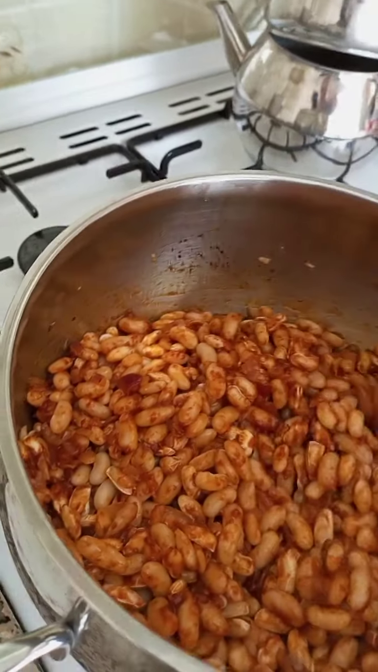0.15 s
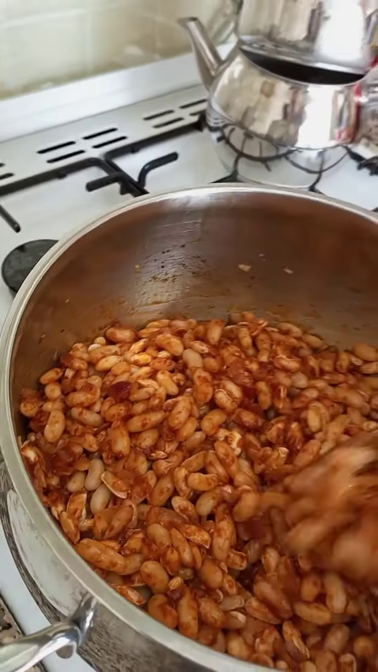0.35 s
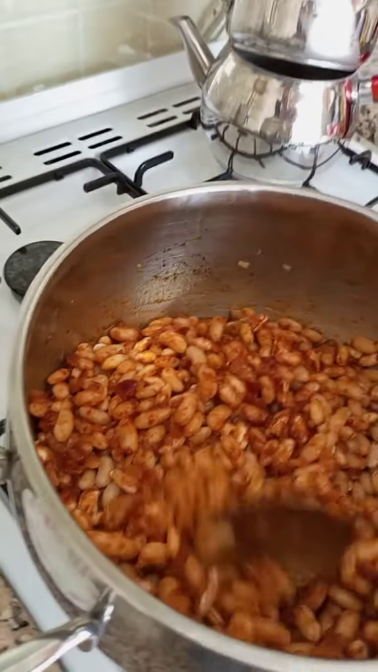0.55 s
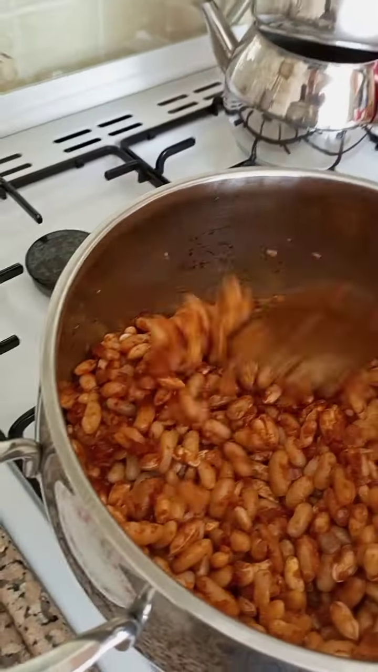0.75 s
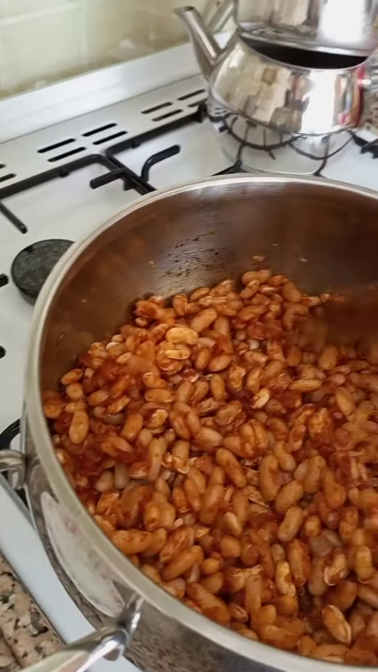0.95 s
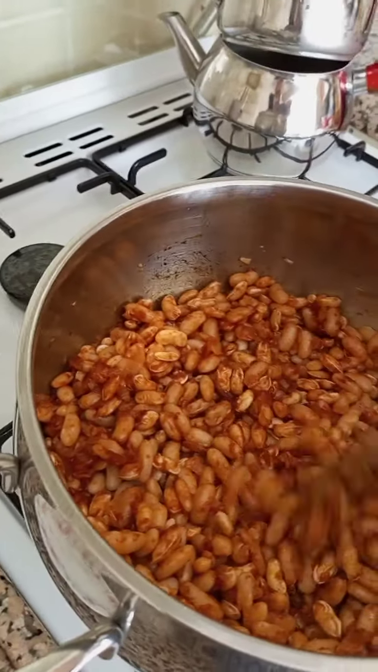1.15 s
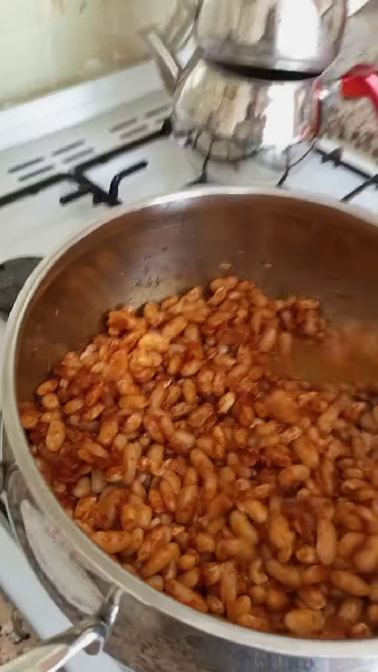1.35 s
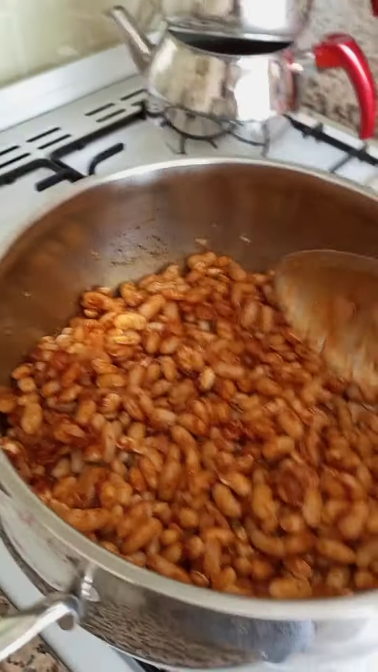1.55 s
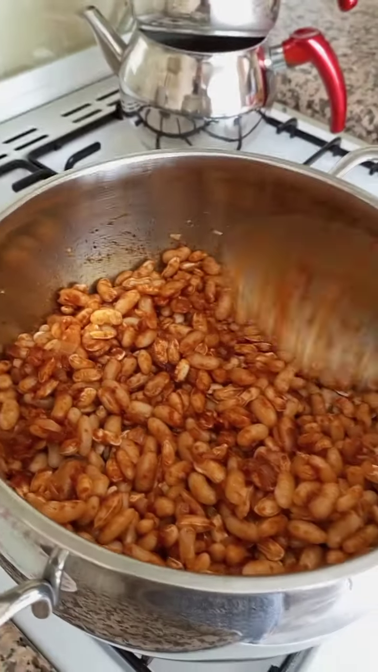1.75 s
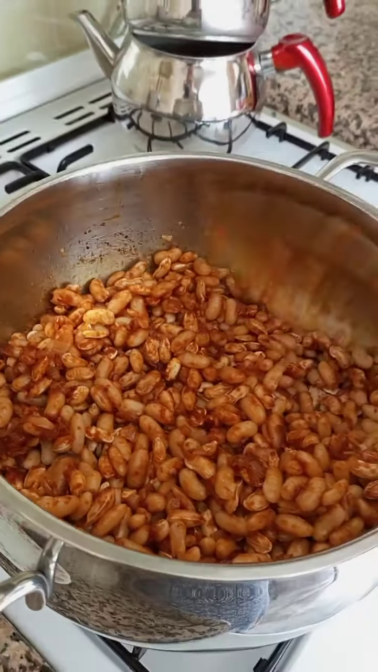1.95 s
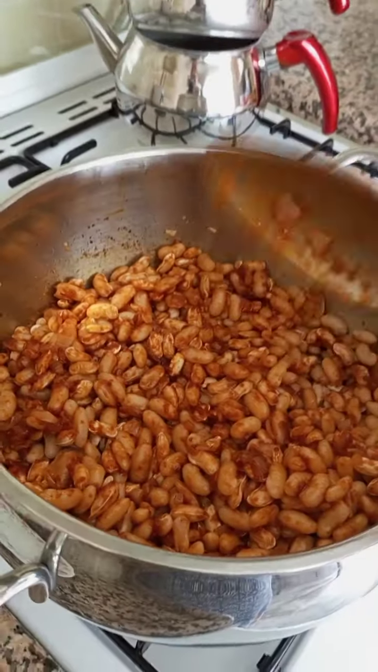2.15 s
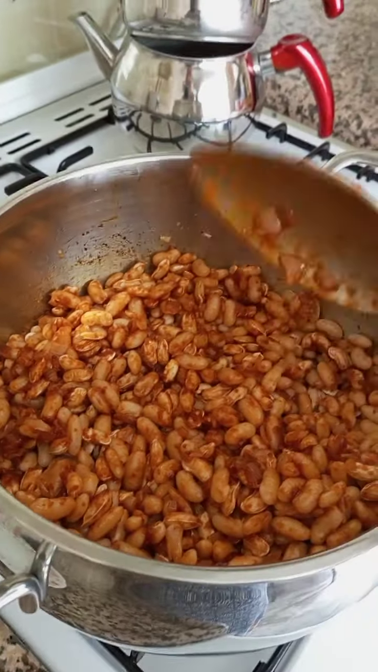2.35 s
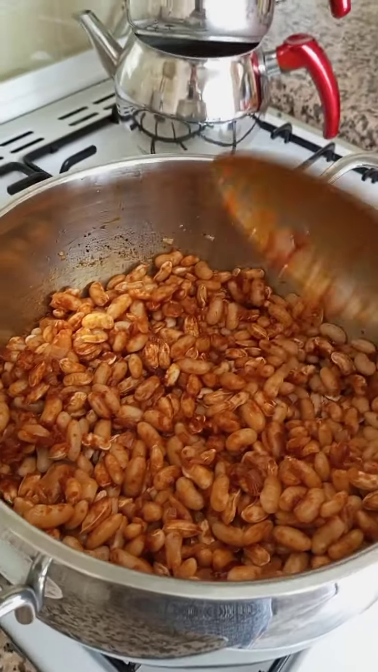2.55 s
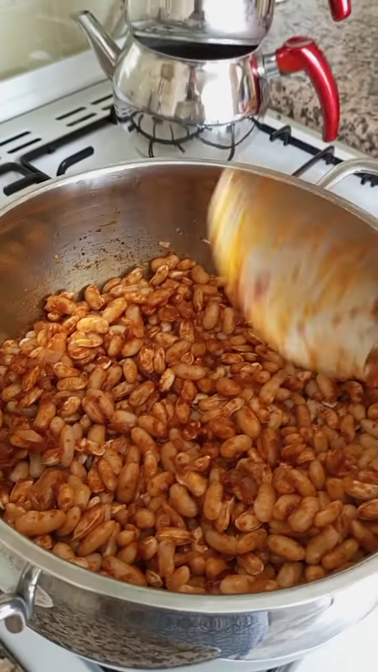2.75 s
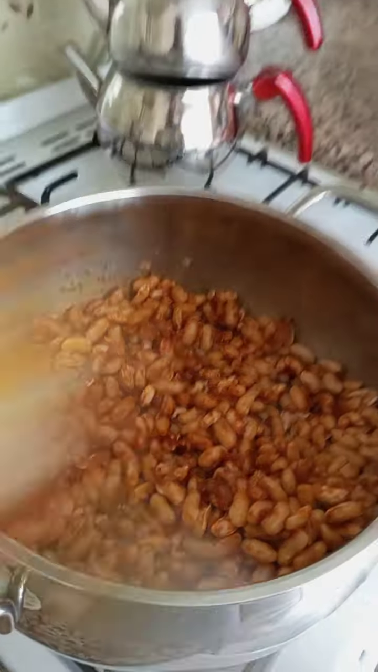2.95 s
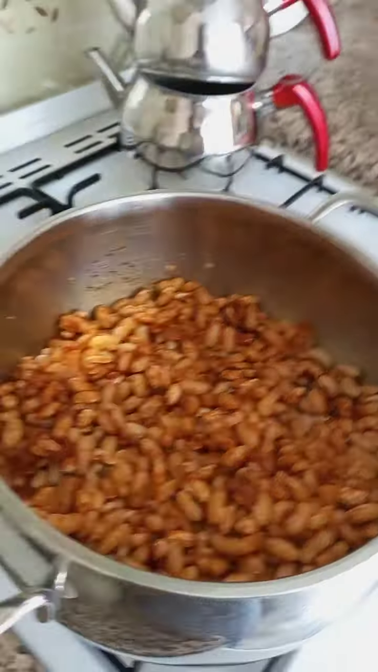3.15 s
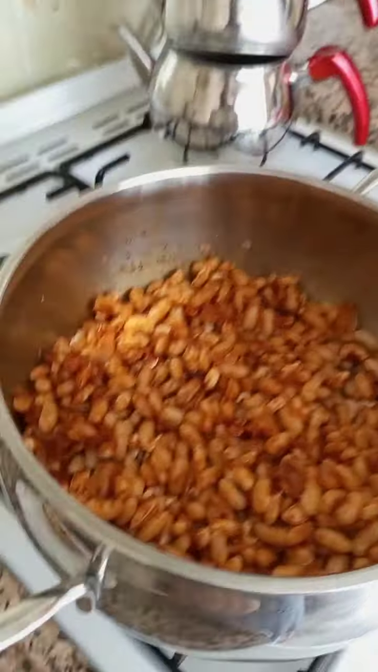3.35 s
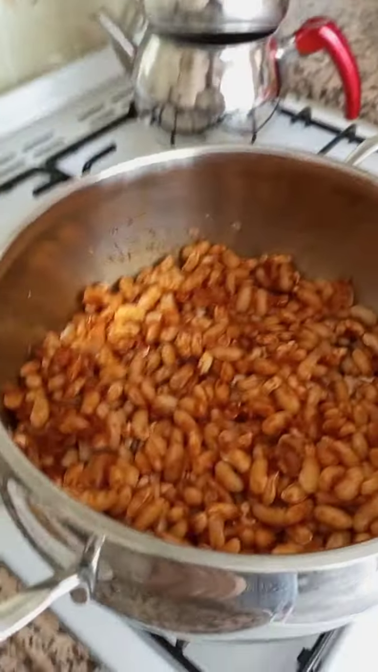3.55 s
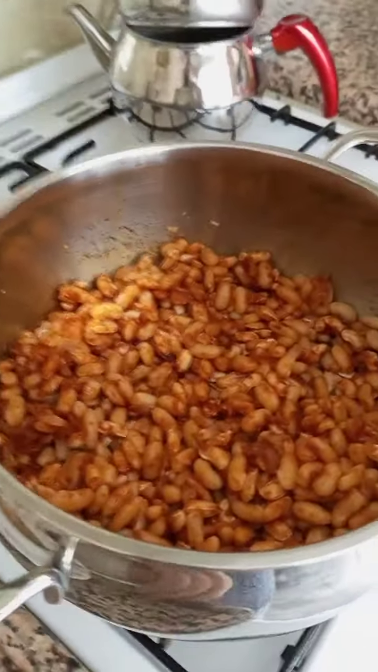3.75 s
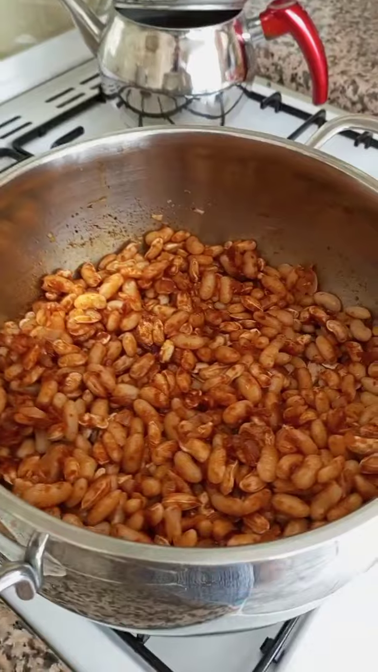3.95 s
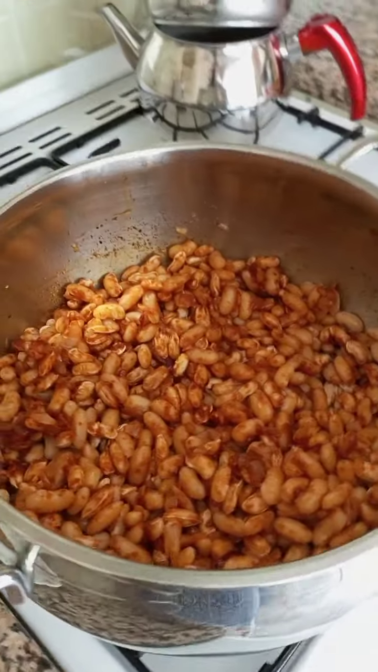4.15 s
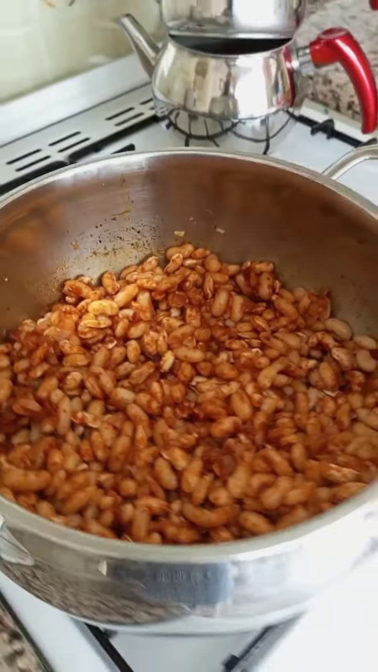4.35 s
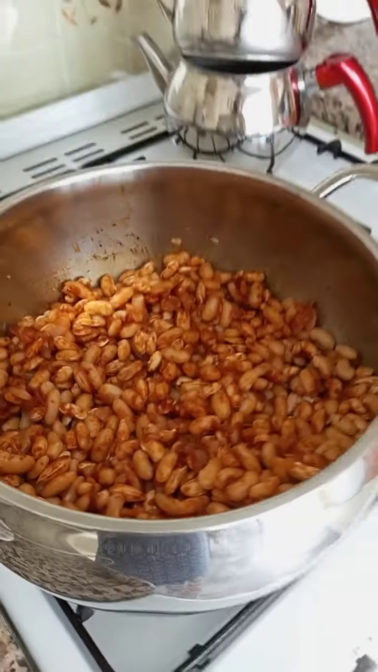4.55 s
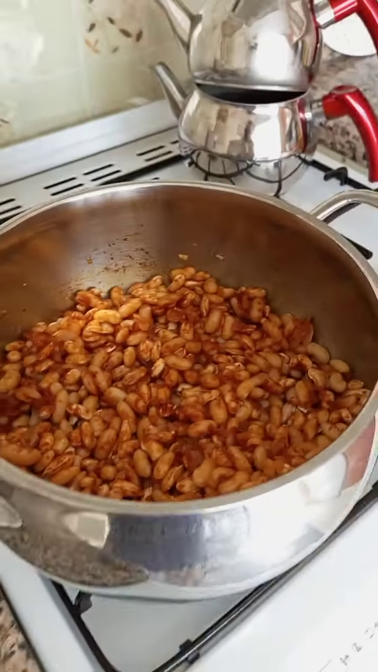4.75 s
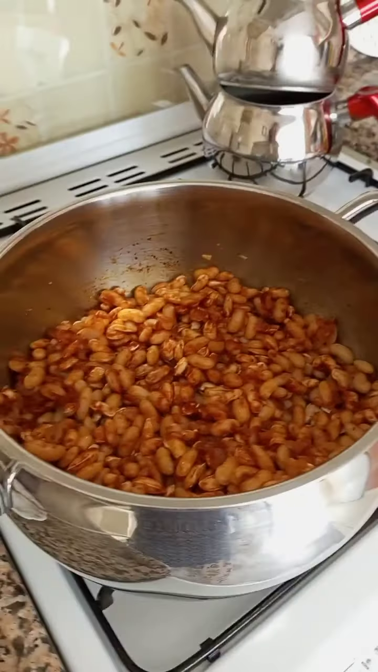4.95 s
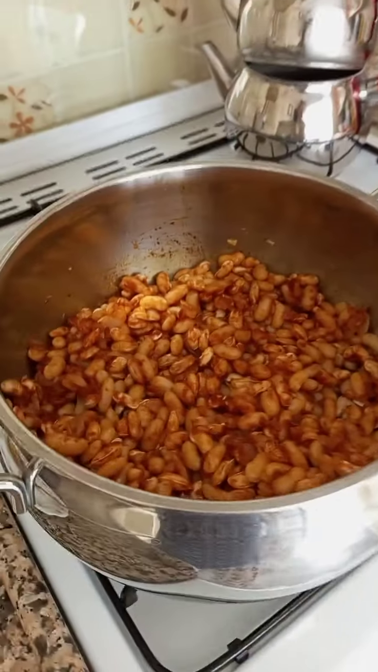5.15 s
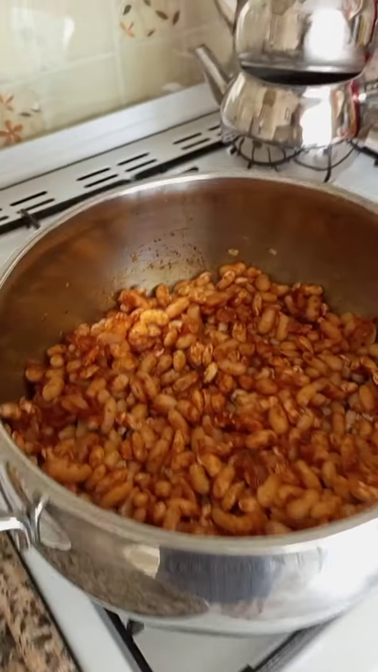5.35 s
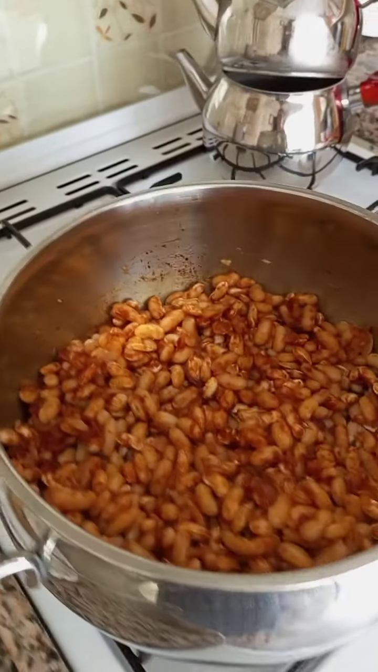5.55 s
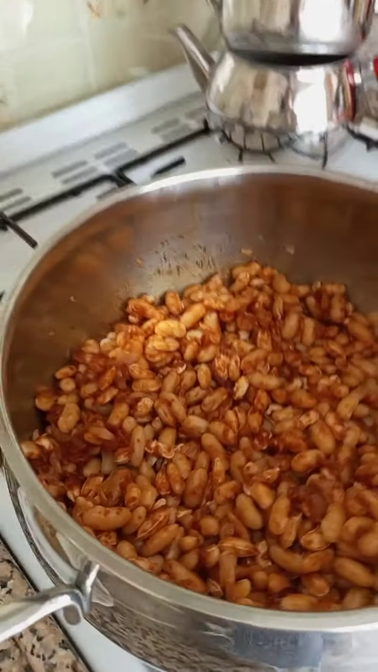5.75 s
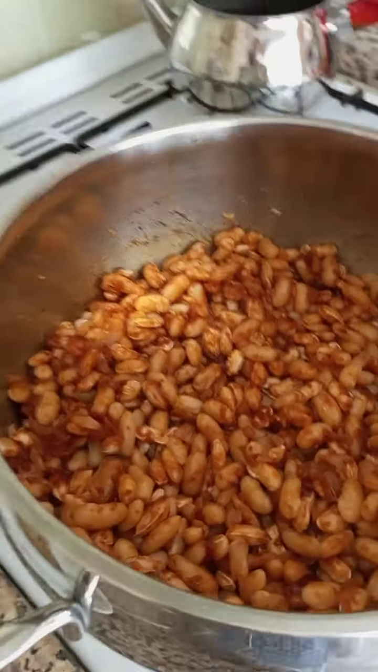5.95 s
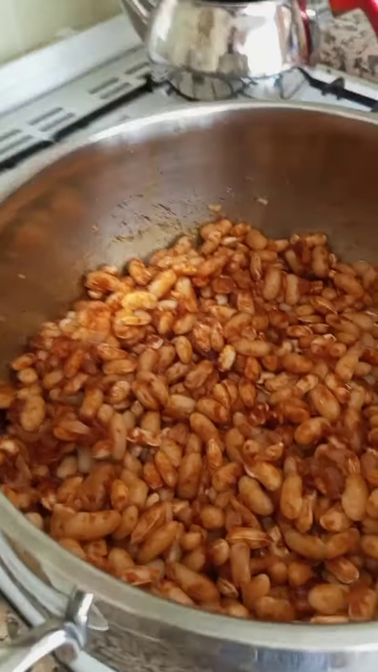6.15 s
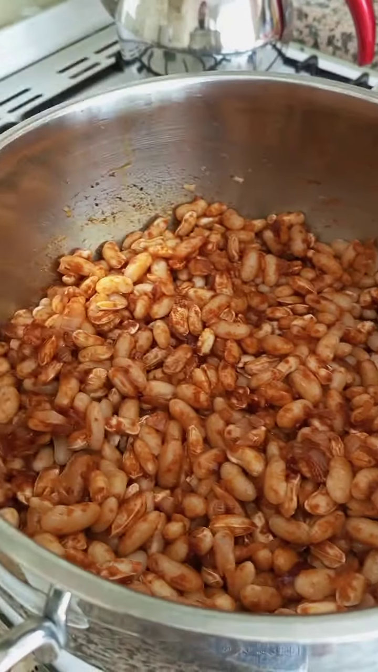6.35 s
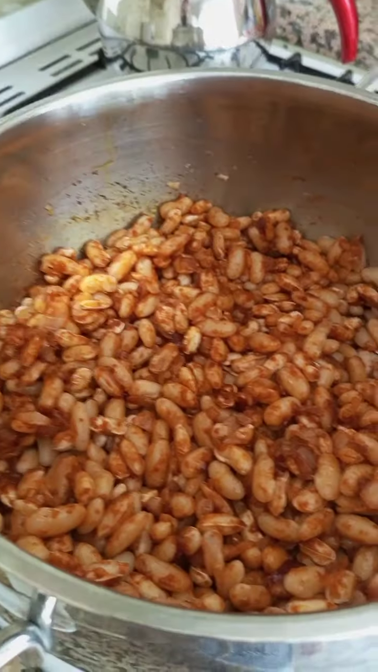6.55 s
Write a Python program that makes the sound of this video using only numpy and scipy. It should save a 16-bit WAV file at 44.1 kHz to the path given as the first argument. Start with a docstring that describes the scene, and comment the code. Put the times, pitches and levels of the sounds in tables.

```python
"""Beans fry in oil in a steel pot on a kitchen stove, close to the microphone: filtered crackle and noise.
A spoon turns them over in bursts of hiss and scrape, then is knocked clean six times on the rim,
as dying modes and noise. It slides and clinks down nearby. Spits, bursts and thin whistles of steam
are short bands of noise. A small tiled kitchen adds its tail; the recorder's limiter flattens each knock."""
import sys
import numpy as np
from scipy import signal
from scipy.fft import rfft, irfft
from scipy.io import wavfile
from scipy.ndimage import uniform_filter1d, minimum_filter1d

SR = 44100
rng = np.random.default_rng(int(sys.argv[2]) if len(sys.argv) > 2 else 0)


def output_pcm(signal):
    """Save a mono or channel-first signal as 16-bit PCM at the path in sys.argv[1].

    Samples are clipped to [-1, 1] before scaling.
    """
    pcm = np.clip(np.atleast_2d(signal).T, -1, 1) * 32767
    wavfile.write(sys.argv[1], SR, np.round(pcm).astype(np.int16))


N = 291060
TIME = np.arange(N) / SR

# resonances of the air in the pot: pitch_hz, width_hz, early_lift_db, late_lift_db
POT_AIR = [(114, 26, 7, 6), (190, 17, 6, 3.5), (325, 5.3, -3, -5), (511, 83, 12.5, 5.5),
           (985, 99, 9.5, 4.5), (1074, 69, 0, 7.5), (1407, 41, 0.5, 8.5), (1690, 380, 9, 3),
           (2540, 73, 5, 4.5)]
# spoon on the rim: start_s, strength_db, tilt_db_per_octave, second_touch_delay_s, second_touch_db
KNOCKS = [(1.6010, -3, 0, 0.043, -5.5), (1.834, -1.5, 0.5, 0.0054, -8), (2.0559, -1.5, -0.5, 0.0038, -7),
          (2.2776, -2, -0.5, 0.0028, -7), (2.4907, 0.5, -0.5, 0.0047, -18), (2.7063, -1.5, -.5, 0.0046, -8)]


def frying():
    """Steam bubbles under the beans sound through the pot's air; tiny bursts of oil fizz on top."""
    # how hard the beans fry, before a fixed lift: time_s, bubbles_db, fizz_db
    vigour = [(0, -54, -56), (0.75, -53, -55.5), (1.3, -53.5, -55.5), (1.6, -53.5, -58), (3.2, -53.5, -56),
              (3.9, -53, -56.5), (4.4, -54.5, -57.5), (5.08, -56.5, -57.5), (5.5, -53, -57),
              (6.6, -54, -54)]
    # spectrum of the bubbling: pitch_hz, relative_db_per_hz
    bubbling = [(30, -24.5), (55, -2), (80, -10), (115, 2), (180, -8), (290, 4.5), (450, -4), (780, -4.5),
                (1300, -4), (2100, -5), (2700, -4), (3500, -2.5), (4600, -15.5), (9000, -38)]
    # spectrum of the oil's fizz: pitch_hz, relative_db_per_hz
    fizzing = [(1500, -29), (3300, -7.5), (4500, -1), (5800, 2.5), (6600, 1.5), (7500, 0.5), (9000, -5),
               (10300, -13.5), (11500, -19), (13600, -19.5), (15200, -10), (16000, -15.5)]
    air = np.array(POT_AIR)
    early_air, late_air = air[:, :-1], np.delete(air, 2, axis=1)

    boil = crackle(per_s=2500, spread_db=2.0) + 0.78 * rng.standard_normal(N) + 0.17 * plops()
    # the pot's resonances shift during the knocks: cross over from the early lifts to the late ones
    later = np.interp(TIME, [KNOCKS[0][0], KNOCKS[-1][0]], [0, 1])
    bubbles = (1 - later) * colour(boil, bubbling, early_air)
    bubbles += later * colour(boil, bubbling, late_air)
    fizz = colour(crackle(per_s=1900, spread_db=3.0) + 0.88 * rng.standard_normal(N), fizzing)

    bubbles_gain = amp(4.0 + 0.85 * wander(top_hz=16)) * level(vigour, axis=1)
    fizz_gain = amp(3.5 + 0.8 * wander(top_hz=20)) * level(vigour, axis=2)
    return bubbles_gain * bubbles + fizz_gain * fizz


def plops(per_s=8.0, spread_db=4.5, cycles=14, count=12):
    """Single bubbles in the sauce: short tones that glide up as they burst."""
    out, t = np.zeros(N), np.arange(SR // 12) / SR
    for hz in np.geomspace(350, 3500, count):
        age = t * hz / cycles
        bubble = np.sin(2 * np.pi * hz * t * (1 + 0.016 * age)) * age * np.exp(-3 * age)
        train = signal.oaconvolve(crackle(per_s, spread_db, cap=3.2), bubble)[:N]
        out += unit(train) * np.sqrt(hz)
    return unit(out)


def stirring(squelch_uneven_db=2.1, drag_uneven_db=0.2):
    """Turned beans spit on the hot steel while the spoon drags through them."""
    # strokes of the spoon, wet beans on steel and spoon dragging: start_s, length_s, wet_db, drag_db
    strokes = [(-0.02, 0.18, -35.5, -40.5), (0.343, 0.035, -50, -63), (0.872, 0.052, -44.5, -58),
               (0.958, 0.16, -55.5, -66)]
    # spectrum of wet beans on hot steel: pitch_hz, relative_db_per_hz
    squelching = [(1500, -32), (4300, -11), (6000, 1.5), (7600, 4), (9200, -5.5), (11000, -16.5),
                  (13500, -25), (15500, -18)]
    # spectrum of the dragging spoon: pitch_hz, relative_db_per_hz
    scraping = [(200, -15), (500, -9.5), (1000, -13), (2000, -9), (3100, 2), (3800, -1.5), (5000, -13),
                (10000, -38)]
    squelch = colour(crackle(per_s=3500, spread_db=4.5) + 0.86 * rng.standard_normal(N), squelching)
    drag = colour(crackle(per_s=4000, spread_db=1.5), scraping, np.array(POT_AIR)[:, :-1])
    # the wet hiss stops quickly, the spoon's scrape dies away more slowly
    wet = sum(amp(db) * stroke(s, length, fall_db_per_s=260) for s, length, db, _ in strokes)
    push = sum(amp(db) * stroke(s, length, fall_db_per_s=54) for s, length, _, db in strokes)
    wet = wet * amp(squelch_uneven_db * wander(top_hz=50.5))
    push = push * amp(drag_uneven_db * wander(top_hz=30))
    return wet * squelch + push * drag


def stroke(start, length, fall_db_per_s, attack_s=0.028):
    """Envelope of one stroke: it builds, holds while the spoon pushes, then dies away."""
    age = TIME - start
    return np.clip(age / attack_s, 0, 1) * amp(-fall_db_per_s * np.maximum(age - length, 0))


def knocks(clatter_db=-11.5, ring_db=-4.0):
    """The spoon strikes the rim and touches it once more; pot and grate ring."""
    # modes of the pot, one list per column: pitch_hz, relative_db, t60_s
    pot_hz = [118, 151, 350, 471, 525, 678, 990, 1028, 1084, 1440, 1497, 1933, 2040, 2079, 2234, 2680, 2792,
              3210, 3703, 4151, 4436, 4724, 5052, 5249, 5764, 6099, 6265, 6745, 7671]
    pot_db = [-38, -24.5, -36.5, -31.5, -11, -43, -23.5, -30, -22.5, -33, -20, -31.5, -33, -12.5, -40, -27,
              -35, -29, -30, -42, -22.5, -25, -39, -24, -14, -23, -13, -27, -30]
    pot_t60 = [0.53, 0.26, 0.53, 0.84, 0.12, 0.53, 0.45, 0.33, 0.22, 0.4, 0.29, 0.42, 0.39, 0.35, 0.41,
               0.26, .3, 0.33, 0.35, 0.23, 0.27, 0.33, 0.31, 0.42, 0.26, 0.23, 0.16, 0.17, 0.2]
    # crowded quick modes of pot, spoon and stove grate: pitch_hz, relative_db_per_hz, t60_s
    clatter = [(39.7, -38, 0.65), (87, -4.5, .6), (158, -4.5, 0.66), (257, -5.5, 0.91), (450, -1.5, 0.3),
               (815, 0.5, 0.33), (1360, -8, 0.34), (1510, -0.5, 0.34), (2440, -2, 0.36), (3640, -10, 0.4),
               (4490, 3.5, 0.22), (6200, 5.5, 0.26), (8880, -2, 0.19), (12900, -28, 0.21),
               (16000, -18, .16)]
    out, uneven = np.zeros(N), ripple(depth_db=5.5)
    for s, strength_db, tilt, lag, touch_db in KNOCKS:
        pot = ring(pot_hz, pot_db, pot_t60, tilt, scatter_db=0.5, rise=0.0061)
        add(out, s, amp(strength_db + ring_db) * pot)
        add(out, s, amp(strength_db + clatter_db) * rattle(clatter, tilt, uneven))
        add(out, s + lag, amp(strength_db + clatter_db + touch_db) * rattle(clatter, tilt, uneven))
    return out


def spoon_down(clack_db=-17):
    """The spoon slides with a squeak, its bowl lands, then its handle drops and chatters."""
    # loudness of the slide: time_s, level_db
    slide = [(3.35, -55), (3.395, -35.5), (3.435, -29.5), (3.465, -36.5), (3.495, -33), (3.52, -65)]
    # spectrum of its rasp: pitch_hz, relative_db_per_hz
    rasp = [(150, -24), (400, -0.5), (900, -22), (1500, -7.5), (2200, -3.5), (3300, 1), (4200, -10),
            (7000, -20), (12000, -46)]
    # its resonances: pitch_hz, width_hz, lift_db
    slide_ring = [(1990, 93, 18.2), (3020, 80, 10), (3272, 81, 19.7), (3570, 82, 8.5)]
    # contacts of the spoon: start_s, strength_db, tilt_db_per_octave, handle_share_0_to_1
    landings = [(3.4956, 0.5, -2.5, 0.1), (3.505, -3, -2.5, 0), (3.6292, -2, -2.5, 1),
                (3.6345, -7.5, 5, 0.94), (3.643, -1.5, 0, 0.82), (3.651, -1.5, 0, 0.94),
                (3.657, -14, -2, 0.9)]
    # modes of the spoon, one list per column: pitch_hz, bowl_landing_db, handle_landing_db, t60_s
    spoon_hz = [1852, 2277, 2560, 2680, 2890, 3020, 3076, 3262, 4125, 4457, 5580, 6420, 7060, 7137, 7983,
                8909, 9313, 10260, 11230, 12200, 14600]
    bowl_db = [-38, -26, -24, -20, -24, -34, -41, -35, -27, -29.5, -48, -36, -44, -46, -61.5, -55, -39, -58,
               -64, -70, -75]
    handle_db = [-31, -44, -36, -48, -32, -31, -29, -42, -36, -20.5, -31, -19.5, -25, -14.5, -30, -24, -15,
                 -33, -37, -46, -45]
    spoon_t60 = [0.25, 0.1, 0.11, 0.074, 0.1, 0.22, 0.23, 0.32, 0.092, 0.13, .12, 0.056, 0.096, 0.14, 0.13,
                 0.16, 0.075, 0.093, 0.15, .13, .08]
    # dry clack of the surface under the spoon: pitch_hz, relative_db_per_hz, t60_s
    clack = [(60, -29, 0.17), (170, -16, 0.21), (400, -2.5, 0.13), (1100, -3.5, 0.097), (1900, -1, 0.19),
             (2790, 3, 0.14), (4260, 1, 0.17), (4960, -2, 0.072), (6400, 7, 0.078), (9400, -12.5, 0.069),
             (12900, -35, .08), (16000, -22, .07)]

    squeak = colour(crackle(per_s=3300, spread_db=2.7), rasp, slide_ring)
    out = squeak * level(slide) * (TIME > slide[0][0]) * (TIME < slide[-1][0])
    uneven = ripple(depth_db=5.5, size=300)
    for s, db, tilt, handle in landings:
        modes_db = bowl_db + handle * np.subtract(handle_db, bowl_db)
        add(out, s, amp(db) * ring(spoon_hz, modes_db, spoon_t60, tilt, scatter_db=2.5, rise=0.0003))
        add(out, s, amp(db + clack_db) * rattle(clack, tilt, uneven))
    return out


def pops(spit_t60=0.012, burst_t60=0.082, small_per_s=9):
    """Oil spits sharply, with smaller spits at random in between; steam bubbles burst lower and longer."""
    # the loudest spits of oil: start_s, peak_db, pitch_hz
    spits = [(.015, -26, 6500), (.186, -20, 7600), (.9768, -27, 7300), (1.0047, -32, 5800),
             (1.0696, -34, 6460), (1.3604, -38, 7000), (3.465, -40, 12000), (4.2254, -33, 6900),
             (4.2678, -30, 6900), (4.5207, -32.5, 5870), (4.6829, -36, 6140), (4.868, -33, 5600),
             (5.845, -39, 8700)]
    # large steam bubbles bursting in the sauce: start_s, peak_db, pitch_hz
    bursts = [(.545, -41, 1640), (.595, -46, 970), (.712, -39, 533), (4.045, -43, 406), (4.9867, -36, 3220),
              (5.6846, -36, 1080)]
    out = np.zeros(N)
    for table, t60 in ((spits, spit_t60), (bursts, burst_t60)):
        for s, db, hz in table:
            add(out, s, puff(db, hz, t60))
    for when, size, pitch in rng.random((round(small_per_s * N / SR), 3)):
        db = -40 + 1.5 * (2 * size - 1)
        hz = 6100 * 2 ** (0.6 * (pitch - .5))
        add(out, when * N / SR, puff(db, hz, spit_t60))
    return out


def puff(db, hz, t60, width_share=0.31):
    """A short puff of dying noise around one pitch, with a given peak level."""
    t = np.arange(SR // 4) / SR
    burst = rng.standard_normal(len(t)) * np.exp(-np.log(1000) * t / t60)
    sound = resonate(burst, hz, hz * width_share)
    return amp(db) * sound / abs(sound).max()


def steam(width_hz=170):
    """Faint, fuzzy whistles, narrow bands of noise that swell and fade."""
    # steam singing out between the beans: start_s, length_s, pitch_hz, level_db
    whistles = [(2.899, 0.24, 3550, -52), (3.024, 0.062, 2500, -47.5), (3.948, 0.79, 2630, -56.5),
                (4.992, 0.062, 3080, -57), (5.356, 0.2, 2600, -55)]
    out = np.zeros(N)
    for s, length, hz, db in whistles:
        whistle = resonate(rng.standard_normal(SR), hz, width_hz)[:int(length * SR)]
        add(out, s, amp(db) * whistle * signal.windows.tukey(len(whistle), .5))
    return out


def rumble(start_s=3.7, rise_s=0.75, before_db=-83, after_db=-69.5):
    """A low rumble, a resonant band of noise that swells late."""
    swell_db = np.interp(TIME, [start_s, start_s + rise_s], [before_db, after_db])
    return resonate(rng.standard_normal(N), hz=55, width=26) * amp(swell_db)


def kitchen(x, delay=0.0066):
    """The short reverberation of a small tiled room, noise that dies faster in the treble."""
    # decay of the room: pitch_hz, t60_s
    room = [(100, 0.87), (500, 0.53), (3000, 0.32), (8000, 0.18), (16000, 0.13)]
    tail = dying(room, axis=1)
    tail[:int(delay * SR)] = 0
    return signal.fftconvolve(x, tail / np.linalg.norm(tail))[:N]


def ring(hz, db, t60, tilt, scatter_db, rise):
    """Dying modes; the struck spot shifts their balance, close pairs beat, the ring takes a moment to spread."""
    t, hz = np.arange(SR // 2) / SR, np.array(hz)[:, None]
    phase, split, beat_phase = rng.random((3, len(hz), 1))
    gain = amp(db + scatter_db * rng.standard_normal(len(hz))) * tilted(hz[:, 0], tilt)
    beat = 1 + .3 * np.cos(2 * np.pi * ((4 + split * hz / 150) * t + beat_phase))
    decay = np.exp(-np.log(1000) * t / np.array(t60)[:, None])
    waves = beat * np.sin(2 * np.pi * (hz * t + phase)) * decay
    return np.sqrt(2) * gain @ waves * (1 - np.exp(-t / rise))


def rattle(table, tilt, uneven):
    """Modes too crowded to tell apart: noise whose bands die at their own speeds."""
    hz = np.fft.rfftfreq(2 * SR, 1 / SR)
    shape = unit(amp(read(table, hz))) * tilted(hz, tilt)
    return irfft(rfft(dying(table, axis=2, shape=uneven), 2 * SR) * shape)[:SR]


def ripple(depth_db, size=70, crowded_hz=1500):
    """The uneven crowding of one object's many small high modes, as gain over frequency."""
    hz = np.fft.rfftfreq(2 * SR, 1 / SR)
    lumps = np.clip(unit(uniform_filter1d(rng.standard_normal(len(hz)), size)), -2, 2)
    return unit(amp(depth_db * lumps * np.minimum(hz / crowded_hz, 1)))


def tilted(hz, tilt, pivot_hz=3000):
    """Gain of a blow over frequency: a harder one favours the high modes."""
    return amp(tilt * np.log2((hz + 200) / pivot_hz))


def dying(table, axis, shape=1, size=256):
    """One second of noise of a given spectral shape in which each band dies at its own speed."""
    noise = irfft(rfft(rng.standard_normal(2 * SR)) * shape)[:SR]
    hz, t, bands = signal.stft(noise, SR, nperseg=size)
    decay = amp(-60 * t / read(table, hz, axis=axis)[:, None])
    return signal.istft(bands * decay, SR, nperseg=size)[1][:SR]


def crackle(per_s, spread_db, cap=4.1):
    """Random clicks, most small and a few large; rms 1."""
    size = amp(spread_db * np.minimum(rng.exponential(1, N), cap)) * rng.choice([-1, 1], N)
    return unit(size * (rng.random(N) < per_s / SR))


def wander(top_hz):
    """A random wavering, twelve sines up to top_hz; rms 1 before interpolation."""
    t = np.arange(0, N / SR + .01, .005)
    rates = np.geomspace(top_hz / 6, top_hz, 12)
    waves = sum(np.sin(2 * np.pi * (hz * t + rng.random())) / np.sqrt(hz) for hz in rates)
    return np.interp(TIME, t, unit(waves))


def colour(x, spectrum, lifts=(), size=8192):
    """Causal filter with a smooth spectrum and resonant lifts; rms 1 out."""
    hz = abs(np.fft.fftfreq(size, 1 / SR))
    db = read(spectrum, hz)
    db = db + sum(lift / (1 + (2 * (hz - f) / width) ** 2) for f, width, lift in lifts)
    # minimum phase from the log spectrum
    response = np.fft.ifft(np.exp(np.conj(signal.hilbert(np.log(amp(db)))))).real
    return unit(signal.oaconvolve(x, response[:size // 2])[:N])


def resonate(x, hz, width):
    """A steep resonance, one peak filter run twice; rms 1 out."""
    b, a = signal.iirpeak(hz, hz / width, SR)
    return unit(signal.lfilter(b, a, signal.lfilter(b, a, x)))


def smooth(x, seconds):
    """One-pole lag."""
    r = np.exp(-1 / (seconds * SR))
    return signal.lfilter([1 - r], [1, -r], x)


def amp(db):
    """Decibels to gain."""
    return 10 ** (np.asarray(db) / 20)


def unit(x):
    """Scales to rms 1."""
    return x / np.sqrt(np.mean(x ** 2) + 1e-20)


def read(points, hz, axis=1):
    """One column of a table over log frequency."""
    table = np.array(points)
    return np.interp(np.log(hz + 1), np.log(table[:, 0]), table[:, axis])


def level(points, axis=1):
    """One dB column of a table over time, as gain."""
    table = np.array(points)
    return amp(np.interp(TIME, table[:, 0], table[:, axis]))


def add(mix, s, sound):
    """Mixes a sound in at a time in seconds."""
    part = mix[max(round(s * SR), 0):][:len(sound)]
    part += sound[:len(part)]


def scene():
    """Everything at the stove, direct and through the room."""
    pan = frying() + stirring() + pops() + steam() + rumble()
    pot, spoon = knocks(), spoon_down()
    into_room = amp(-14.5) * pan + amp(-21.5) * pot + amp(-15.5) * spoon
    return (pan + pot + spoon + kitchen(into_room))[None]


def record(dry, threshold_db=-21.0, sense_hz=4600, recovery_db_per_s=300, attack_s=0.00042, ceiling=0.41):
    """The microphone sheds deep bass; a limiter, less alert to treble, lets attacks through, holds, lets go."""
    sound = signal.sosfilt(signal.butter(3, 42, "high", fs=SR, output="sos"), dry[0])
    sensed = signal.sosfilt(signal.butter(2, sense_hz, fs=SR, output="sos"), sound)
    power = smooth(sensed ** 2, .004)
    over_db = np.maximum(10 * np.log10(power + 1e-12) - threshold_db, 0)
    # hold the largest excess of the last 22 ms, then recover at a steady rate
    half_hold = int(.011 * SR)
    held_db = -minimum_filter1d(-over_db, 2 * half_hold + 1, origin=half_hold)
    recovery = recovery_db_per_s * TIME
    cut_db = np.maximum.accumulate(held_db + recovery) - recovery
    limited = sound * amp(-smooth(cut_db, attack_s))
    rounded = ceiling * np.tanh(limited / ceiling)  # the tallest peaks round off
    treble_edge = signal.firwin(511, 16000, window=("kaiser", 9), fs=SR)
    return signal.oaconvolve(rounded, treble_edge, "same")[None]


dry = scene()
out = record(dry)
output_pcm(out)
```